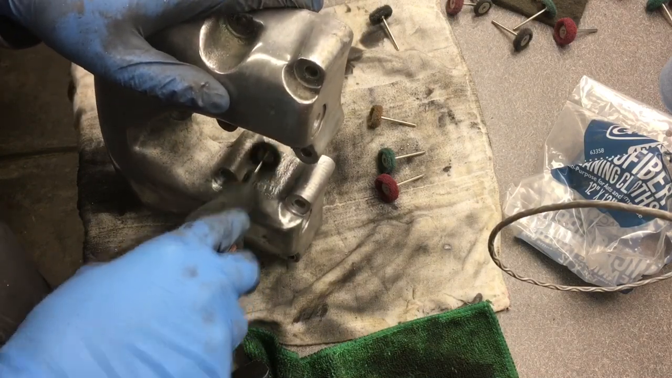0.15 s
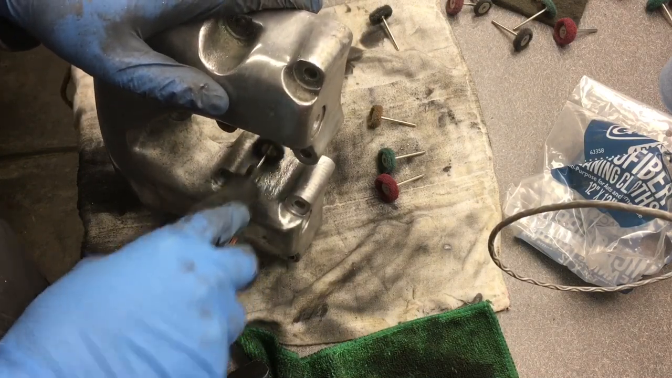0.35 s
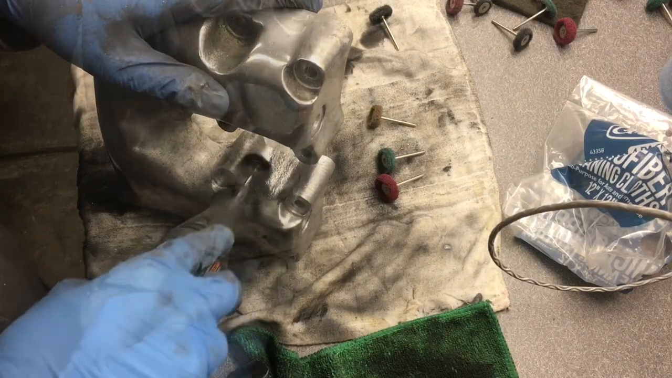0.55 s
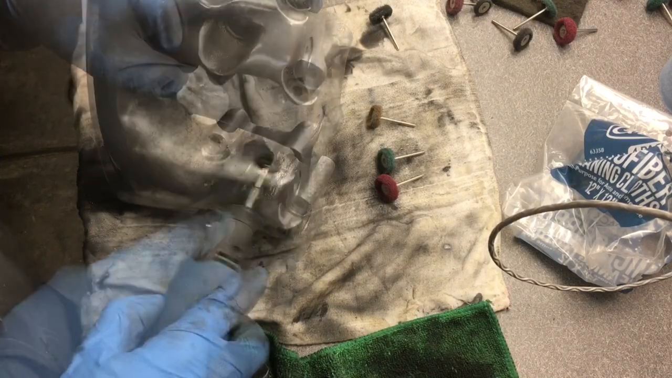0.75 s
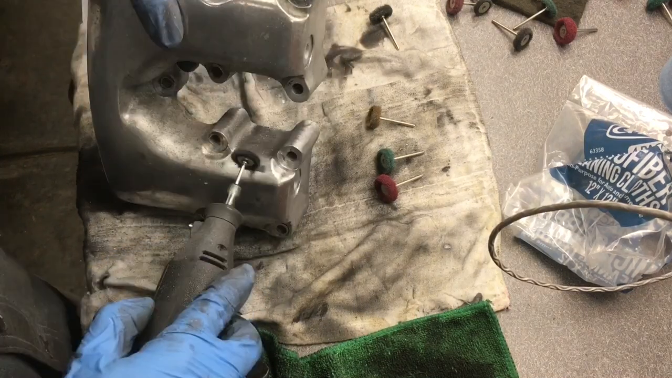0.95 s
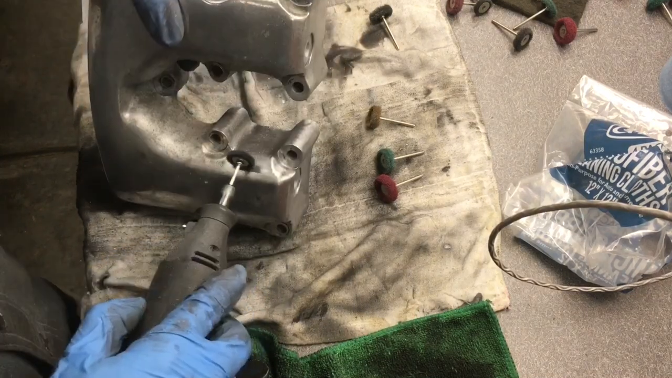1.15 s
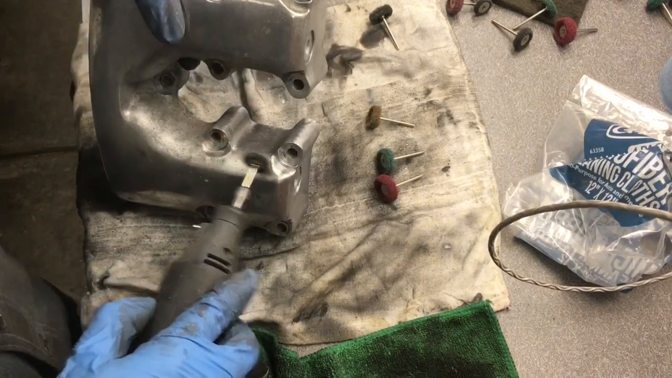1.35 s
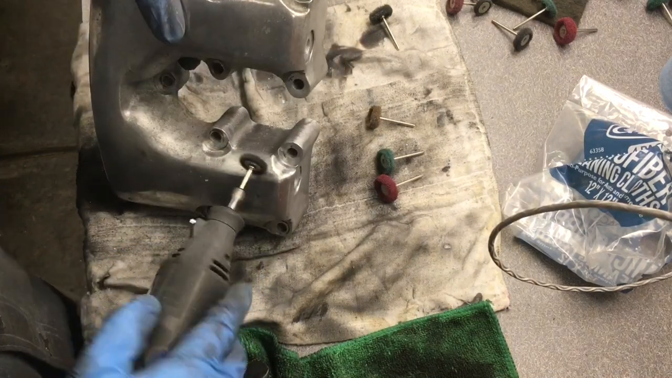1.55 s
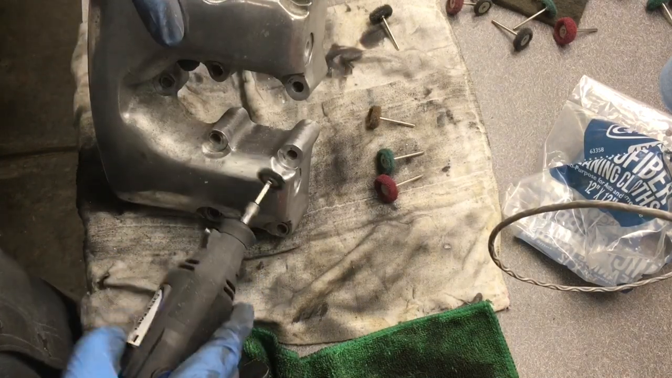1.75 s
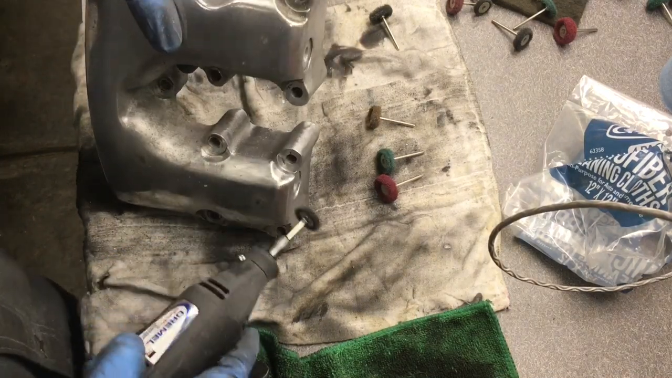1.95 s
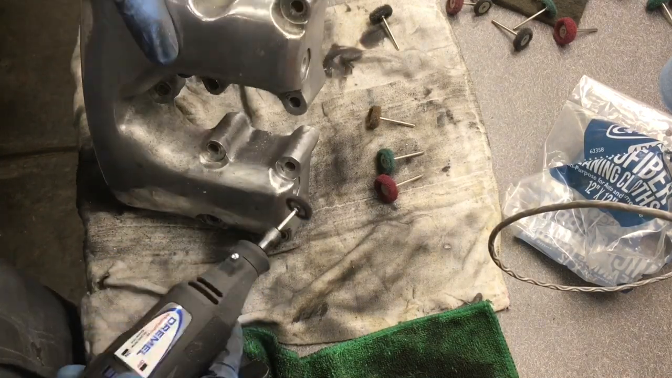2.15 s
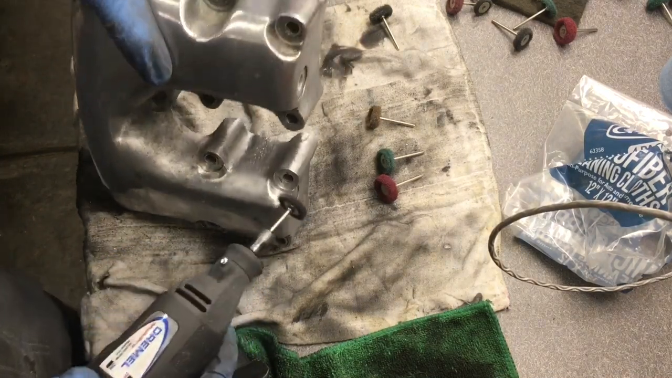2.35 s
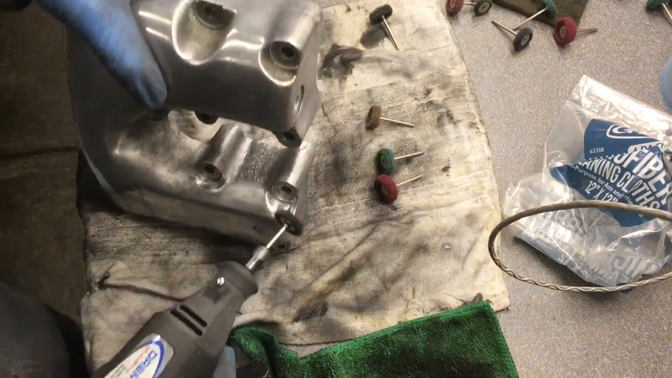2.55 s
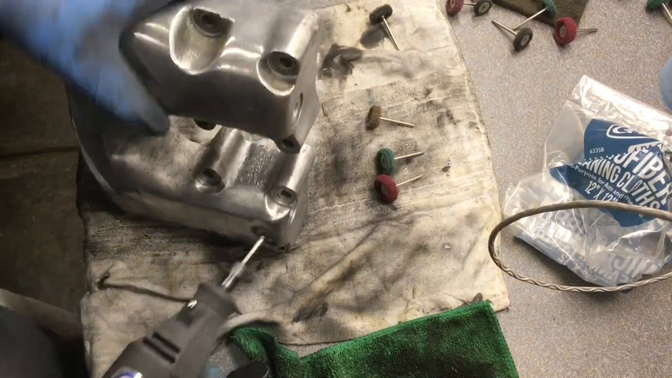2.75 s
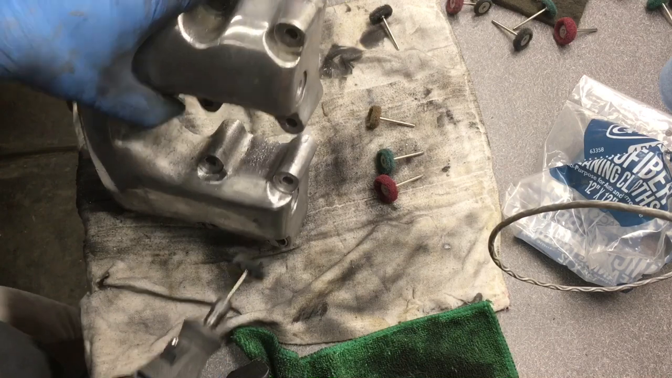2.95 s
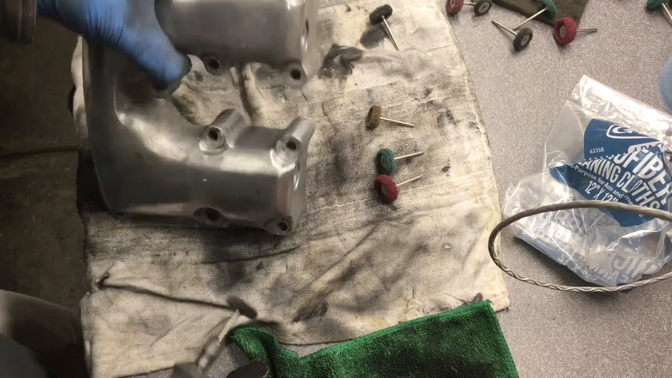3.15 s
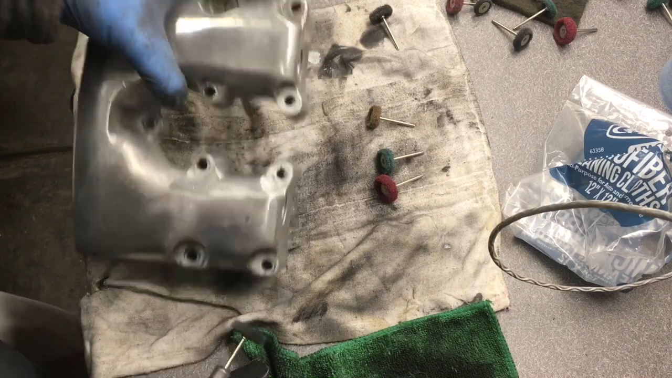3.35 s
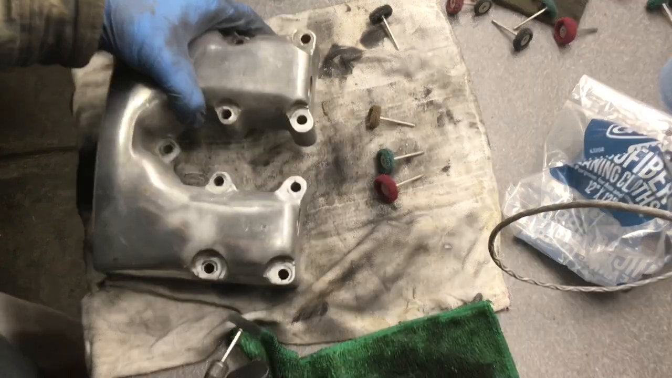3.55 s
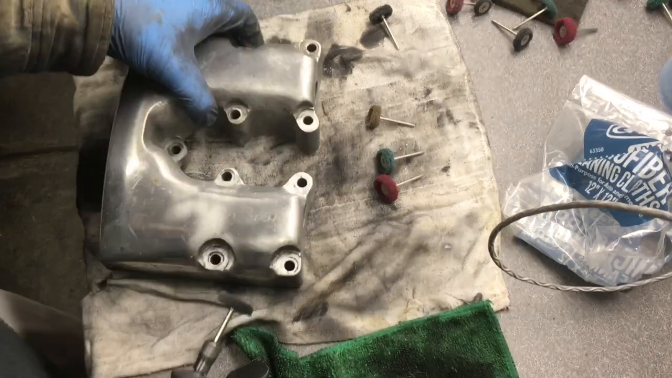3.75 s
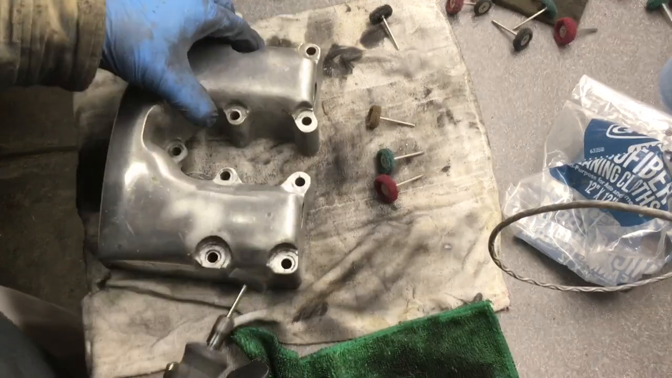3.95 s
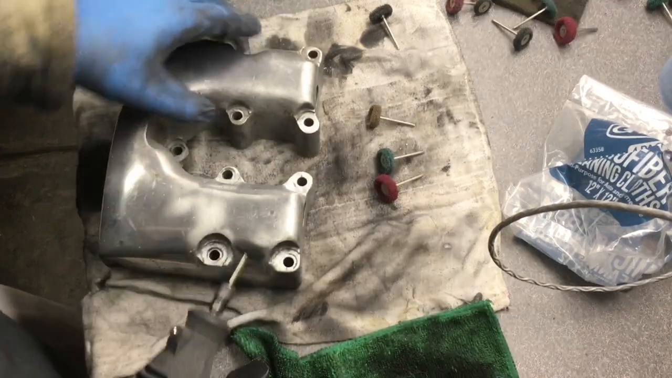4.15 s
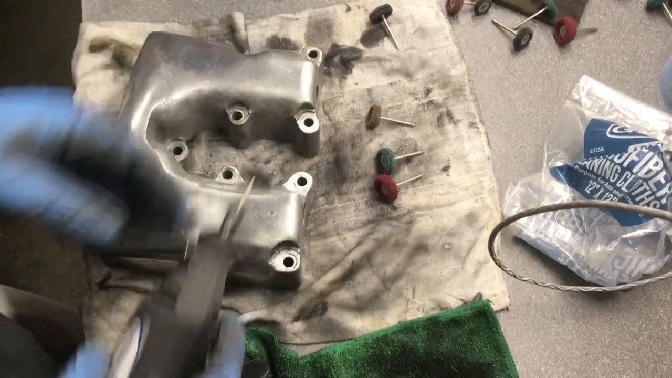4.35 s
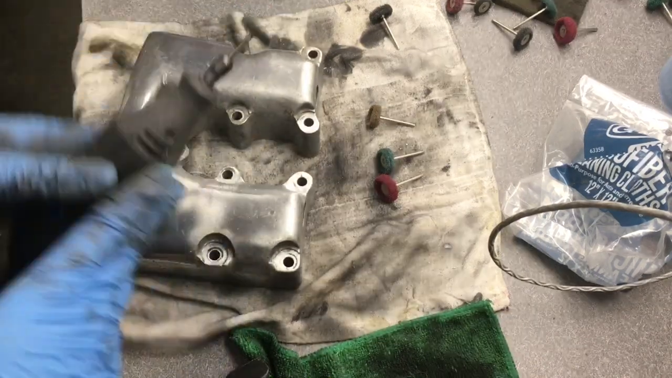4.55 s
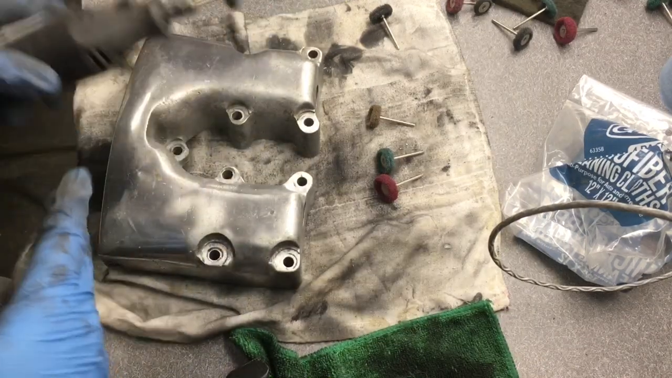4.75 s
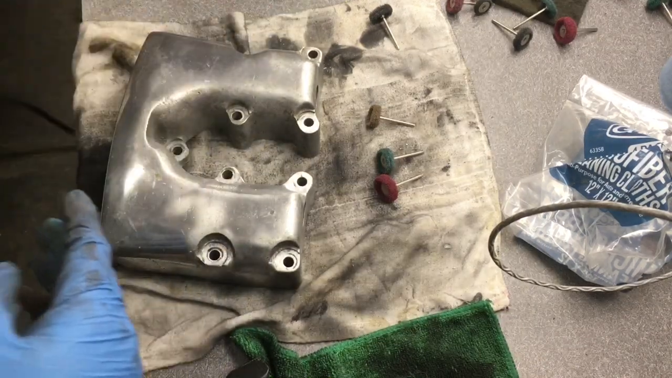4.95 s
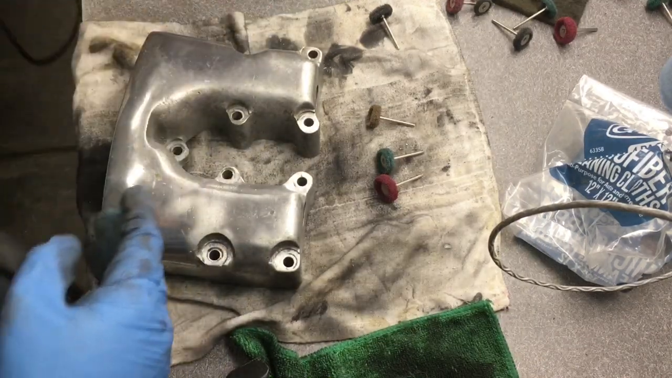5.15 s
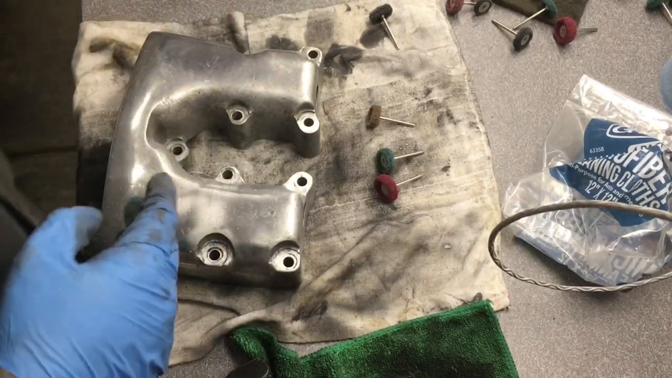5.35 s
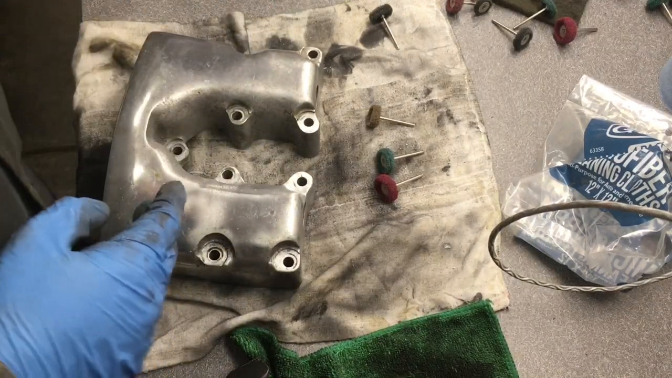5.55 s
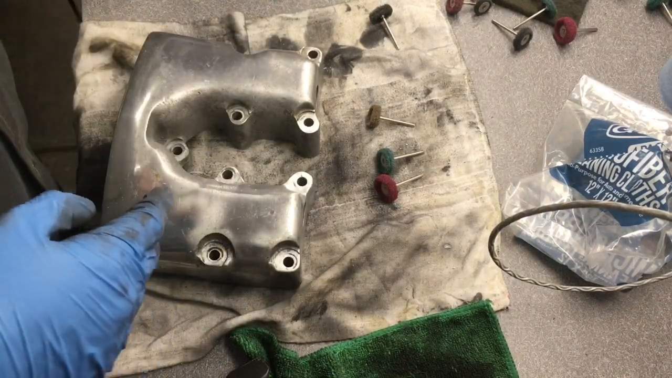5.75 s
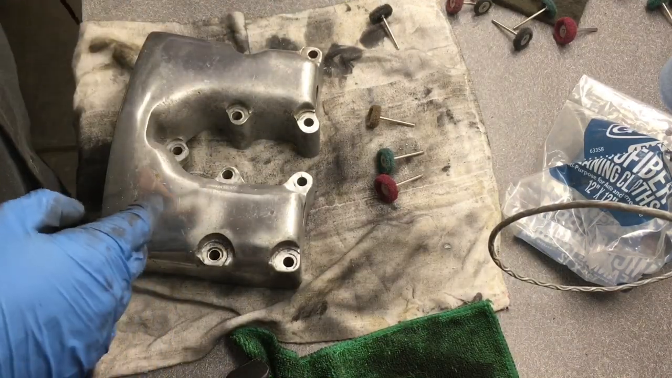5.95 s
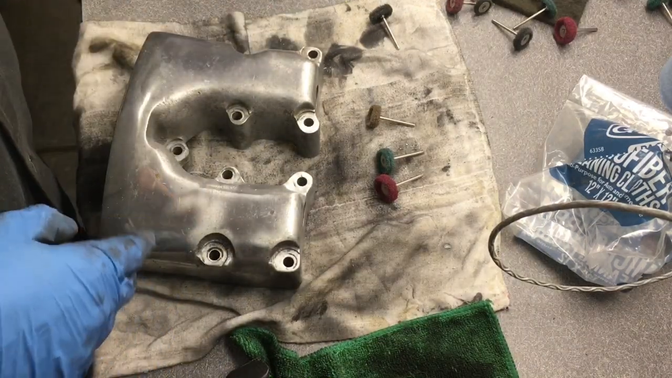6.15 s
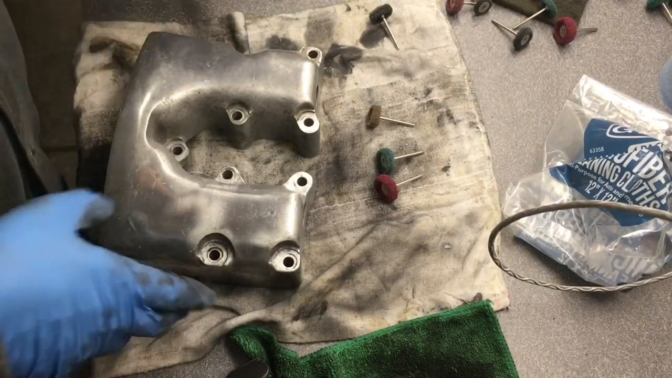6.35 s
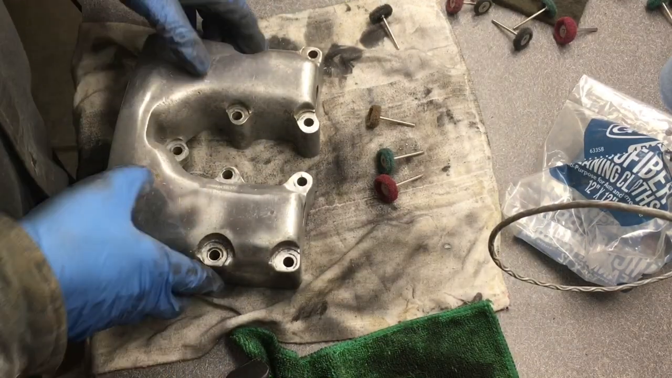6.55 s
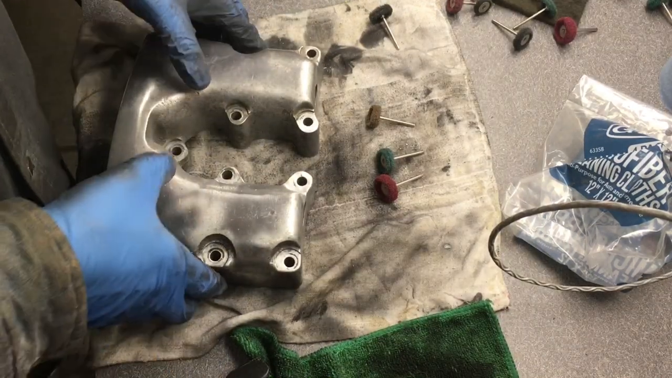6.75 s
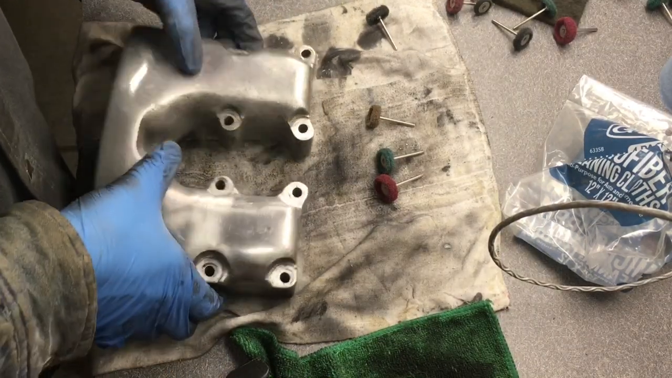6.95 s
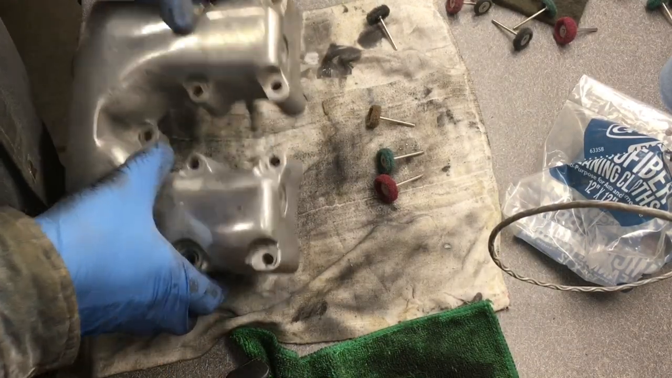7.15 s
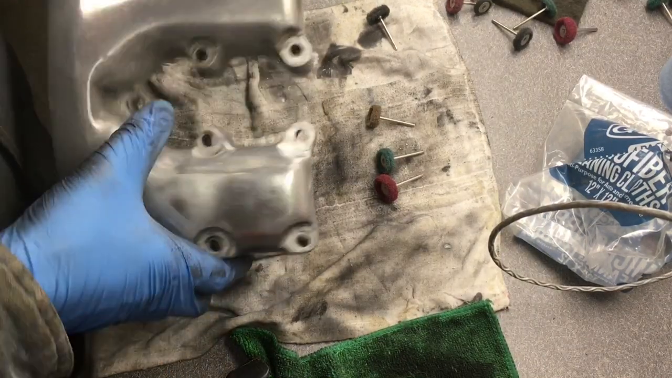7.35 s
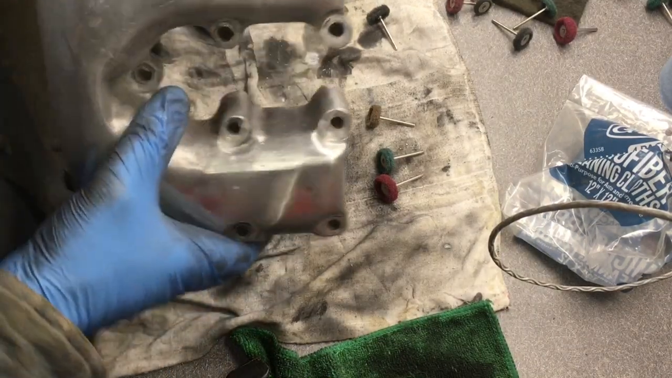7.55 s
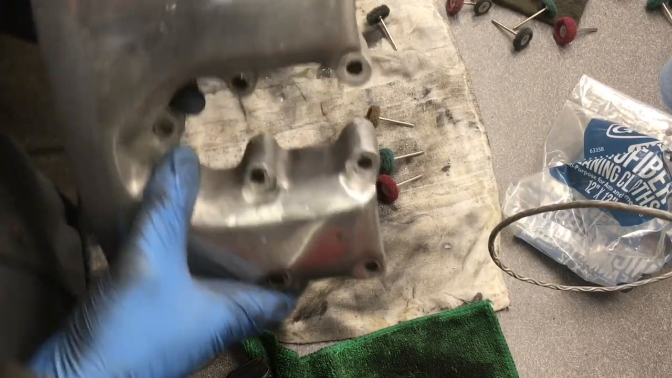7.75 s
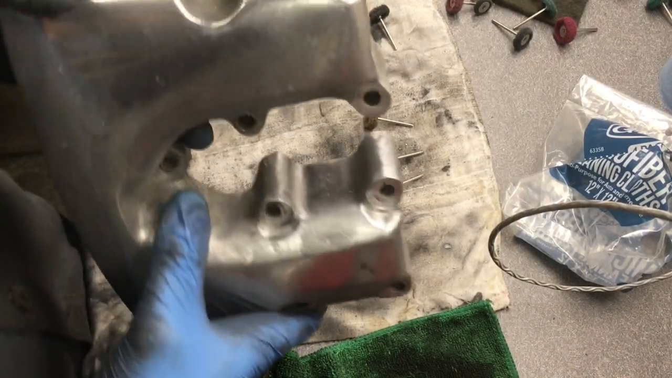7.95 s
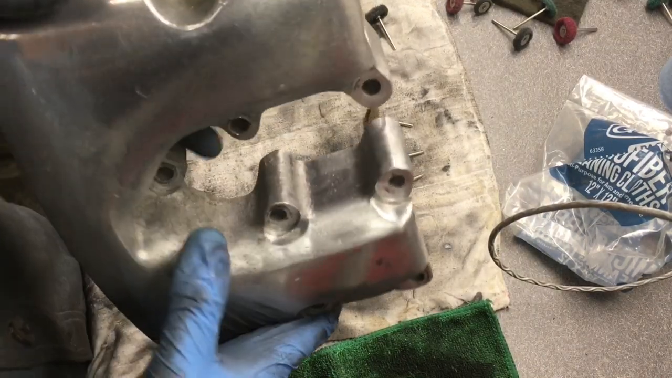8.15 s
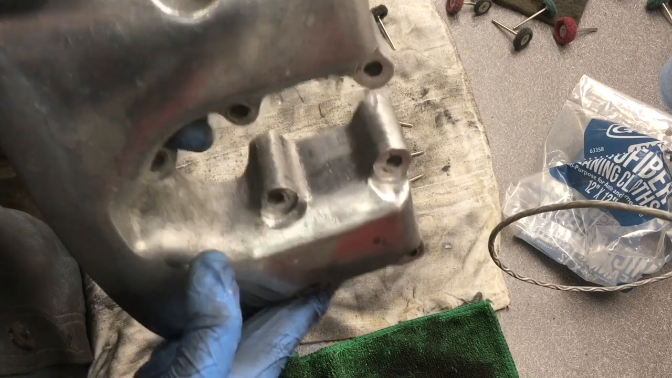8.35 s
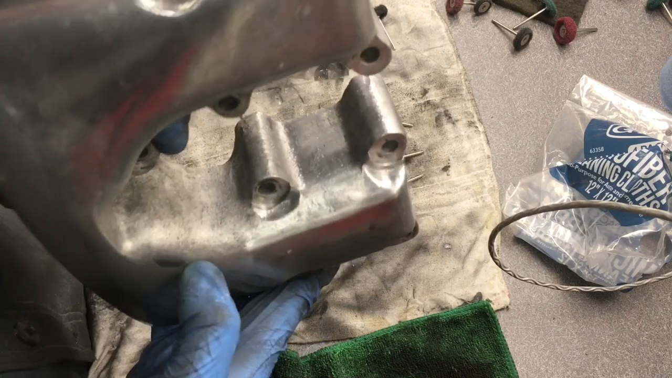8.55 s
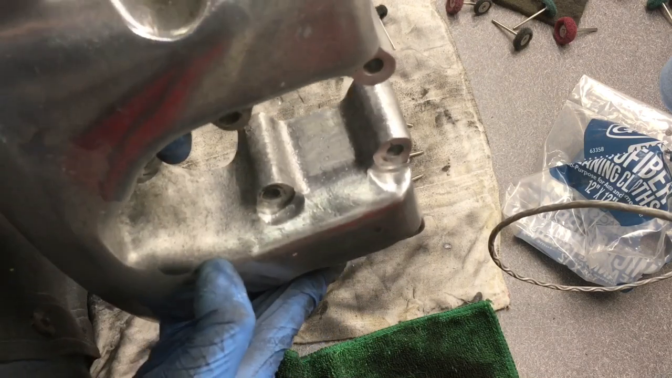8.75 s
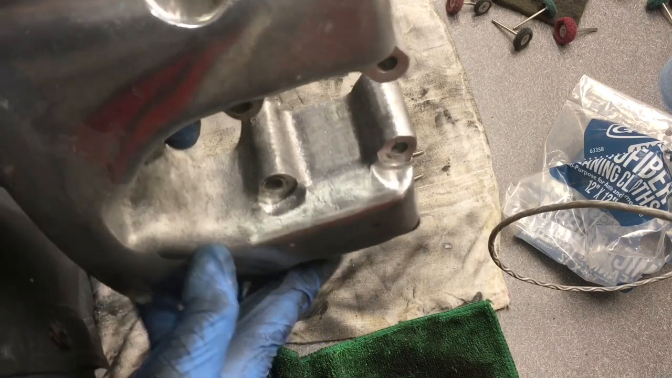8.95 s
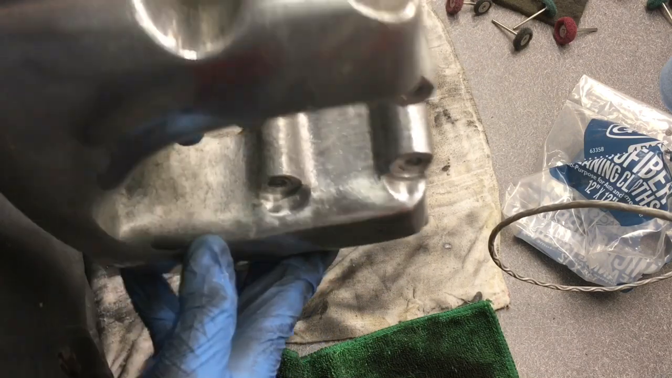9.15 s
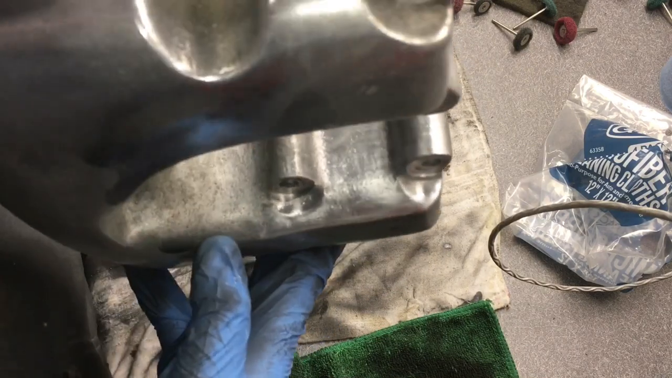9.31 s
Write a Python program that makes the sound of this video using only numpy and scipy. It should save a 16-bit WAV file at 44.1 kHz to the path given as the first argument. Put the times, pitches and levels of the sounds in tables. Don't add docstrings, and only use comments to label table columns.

```python
import sys
import numpy as np
from scipy import signal
from scipy.fft import rfft, irfft, next_fast_len
from scipy.io import wavfile
from scipy.ndimage import uniform_filter1d

SR = 44100
rng = np.random.default_rng(int(sys.argv[2]) if len(sys.argv) > 2 else 0)


def pcm_store(signal):
    levels = np.round(np.clip(np.atleast_2d(signal), -1, 1) * 32767)
    wavfile.write(sys.argv[1], SR, levels.astype(np.int16).T)


def makeup_ratio(level_db):
    decades = np.asarray(level_db, float) / 20
    return 10 ** decades


N = 413658
TIME = np.arange(N) / SR

# (frequency [Hz], level [dB per Hz])
ROOM_TONE = [(18, -40), (30, -11), (59, 13.5), (100, -22), (114, -31.5), (231, -22.5), (263, -40),
             (333, -23), (444, -53.5), (750, -32), (924, -63), (1050, -58.5), (15600, -68.5)]
ROOM_DB = -53.5
# (frequency [Hz], width [Hz], level [dB])
HUM = [(51.2, 9.2, -47), (70.2, 18, -55), (84.6, 21, -70), (320.5, 33, -62), (222, 21, -66.5)]
# (frequency [Hz], level [dB per Hz])
HISS = [(500, -12), (1000, 0), (4000, -5), (15800, -6)]
HISS_DB = -71
# (frequency [Hz], width [Hz], depth [0-1])
MOUNT_DIPS = [(4860, 490, 0.43), (10390, 190, 0.6)]
CUTOFF_HZ = 15770

# (frequency [Hz], level [dB per Hz])
HANDLING_COLOUR = [(240, -36), (400, 9), (511, 3), (957, 2.5), (1100, 0), (1470, -2.5), (1850, -6.5),
                   (2060, -8.5), (4920, -10.5), (6090, -10), (15500, -13)]
# (start [s], length [s], level [dB], brightness [dB])
RUSTLES = [(4.442, 0.085, -53, 4), (4.605, 0.046, -52.5, 3.5), (4.752, 0.067, -59, -3),
           (4.89, 0.037, -64.5, 3), (5.032, 0.018, -63.5, 2), (5.025, 0.21, -66.5, -12),
           (5.27, 0.33, -67, 1), (5.532, 0.21, -68.5, 2), (5.76, 0.2, -69.5, 1), (6.329, 0.28, -71, 5.5),
           (6.59, 0.24, -66.5, 5.5), (6.865, 0.39, -62.5, 6.5), (7.31, 0.29, -65, 7.5),
           (7.57, 0.087, -59.5, 7.5), (7.704, 0.065, -63, 7), (7.8, 0.29, -69, 7),
           (7.961, 0.046, -65.5, 2.5), (8.156, 0.017, -54.5, 8.5), (8.212, 0.019, -76, 23.5),
           (8.274, 0.023, -61.5, 7), (8.37, 0.16, -61, 6.5), (8.617, 0.16, -69, 4.5),
           (8.778, 0.067, -71, 8), (8.902, 0.19, -63, 7), (9.135, 0.14, -67.5, 3.5)]
RUSTLE_ATTACK_S, RUSTLE_RELEASE_S, RUB_DB, REST_DB = 0.029, 0.047, -7, -83
RUSTLE_SWELL_SHARE = 0.41
# (frequency [Hz], width [Hz])
SHELL = [(6200, 120), (8700, 39), (9400, 67), (12200, 87), (13100, 90), (15400, 110)]

# (time [s], frequency [Hz], level [dB])
SLIDE = [
    (7.0, 955, -84),
    (7.1, 955, -78),
    (7.2, 955, -73),
    (7.29, 955, -69),
    (7.42, 955, -75),
    (7.55, 955, -82),
]
# (time [s], frequency [Hz], level [dB])
WHISTLE = [
    (7.1, 6000, -84),
    (7.19, 6000, -70),
    (7.23, 6400, -73),
    (7.3, 6650, -80),
]
# (frequency [Hz], level [dB], t60 [s])
CASTING = [(970, -17, 0.28), (1300, -8, 0.044), (1466, 2, 0.033), (1580, -4, 0.037), (2050, 1, 0.018),
           (2500, -20, .03), (2860, -13, .04)]
# (time [s], level [dB])
LIFT = [
    (6.875, -93),
    (6.885, -59),
    (7.0, -65),
    (7.12, -67.5),
    (7.3, -75),
    (7.5, -78),
    (7.6, -99),
]
# (frequency [Hz], level [dB], t60 [s])
GLOVE = [(8850, -4, .03), (9500, 4, 0.033), (10000, -19, .03), (13000, -2.5, .03)]
# (time [s], level [dB])
SQUEAK = [
    (5.16, -91),
    (5.18, -63),
    (5.21, -65),
    (5.25, -80),
    (5.27, -92),
]

# (time [s], peak level [dB], centre [Hz], width [Hz], t60 [s])
TICKS = [(3.635, -27, 510, 494, 0.36), (5.08, -50, 1500, 1500, 0.17), (5.105, -48, 1100, 900, .15),
         (5.19, -49, 1000, 900, .15), (4.79, -50, 1500, 1500, 0.12), (5.13, -55, 1700, 1300, 0.18),
         (5.165, -58, 1400, 1200, .2), (3.626, -30, 880, 694, 0.15), (3.631, -35, 1494, 900, .08),
         (6.932, -54, 5200, 2000, .05), (7.083, -47, 6000, 2500, .06), (7.622, -48, 3600, 700, .09),
         (4.463, -39, 1480, 1500, 0.063), (4.626, -34, 9000, 9000, 0.1), (5.036, -46, 4070, 6000, 0.21),
         (5.501, -46, 4080, 1500, 0.048), (5.547, -35.5, 1610, 1820, 0.079), (5.584, -37, 780, 820, 0.34),
         (5.628, -41, 1300, 1480, 0.077), (5.586, -44.5, 9000, 9000, 0.47), (5.781, -50, 2000, 2980, 0.13),
         (5.806, -38.5, 3480, 3500, 0.024), (6.233, -54.5, 740, 398, 0.096),
         (6.882, -47, 1700, 1490, 0.076), (6.935, -43, 11000, 6000, .03), (7.487, -42, 10000, 8000, .04),
         (7.724, -46, 7340, 2000, .06), (8.574, -48, 8800, 1500, 0.056), (8.755, -26.5, 3710, 500, 0.043),
         (8.756, -38, 1500, 600, 0.035), (8.758, -28, 2200, 1400, 0.018),
         (8.755, -26.5, 11010, 9000, 0.045), (8.847, -52, 3550, 500, 0.031), (9.343, -27, 1600, 500, 0.018),
         (9.344, -35, 945, 400, 0.036), (9.344, -41, 2440, 500, 0.1), (9.344, -38, 3900, 600, 0.069),
         (9.345, -46, 7460, 1200, .1), (9.344, -36, 13500, 4000, 0.091), (9.356, -43, 9500, 1200, 0.052)]
# (time [s], peak level [dB], contact [Hz], long-ring share [dB])
THUDS = [(3.615, -30, 140, -3), (3.623, -2.5, 666, -12), (3.627, -7, 170, -12), (3.628, -3, 534, 3),
         (3.631, -5, 500, -6), (3.987, -11, 150, 27), (4.031, -20, 150, 8), (4.062, -21, 250, 12),
         (4.097, -23.5, 150, 8), (4.147, -26, 150, 14), (5.059, -39, 300, -10), (5.217, -32.5, 507, -20),
         (5.584, -26, 300, -10), (5.589, -39, 300, 0), (5.6, -35, 300, 5), (5.608, -37, 350, 0),
         (5.629, -27, 300, -3), (5.64, -31.5, 300, -2), (5.81, -16, 105, 10.5), (6.54, -33.5, 148.5, 9),
         (6.877, -38, 298, -9), (9.36, -28, 252, -14)]
# (frequency [Hz], level [dB], t60 [s])
BENCH = [(64.7, -24.5, 1), (96.7, -8.5, 0.18), (123.5, -1.5, 0.26), (179, -7, 0.14), (273, -5.5, 0.097),
         (393, -7, 0.091), (465, 2, 0.049), (552, -6, 0.11), (650, 4.5, 0.044), (893, -4, 0.087),
         (1200, -5, 0.09)]

# (angle [turns], strength [dB])
BARS = [(0, 0), (.128, -1), (.268, -7), (.381, -9), (.494, -3), (.632, 1), (.757, -5), (.886, -8)]
BOUNCE_S, BOUNCE_DB, BAR_WANDER_DB = .00062, -8, 3.0
# (frequency [Hz], width [Hz], level [dB])
HOUSING = [(1200, 300, -18), (2350, 400, -8), (3600, 800, -4), (4500, 400, -5), (5800, 900, -3),
           (7300, 900, -3), (8800, 900, -3), (9800, 700, -3), (11400, 1200, -4), (12600, 1200, -3),
           (14200, 2000, -3)]
BRUSH_DB, BRUSH_RISE_DB_PER_TURN_PER_S, BRUSH_TOP_DB = -21, .095, 3.5
DRAG_SHARE = 0.52

# (time [s], speed [turns/s])
FIRST_SPEED = [
    (0.0, 438.7),
    (0.13, 436.2),
    (0.26, 435.0),
    (0.38, 432.1),
    (0.56, 440.6),
    (0.65, 450.3),
    (0.74, 457.8),
    (0.95, 465.0),
]
# (time [s], speed [turns/s])
SECOND_SPEED = [
    (0.6, 480.0),
    (0.82, 479.4),
    (0.95, 475.0),
    (1.12, 479.9),
    (1.5, 486.0),
    (1.62, 492.0),
    (1.8, 510.5),
    (2.16, 530.0),
    (2.555, 538.6),
]
SWITCH_OFF_S, REFERENCE_TURNS_PER_S = 2.555, 500
BEARING_LOSS, BEARING_POWER, WINDAGE_LOSS, WINDAGE_POWER = 288.0, .1398, 45.1, 9.11
LIFT_OFF_S, LIFT_OFF_TAKES_S = 2.575, 0.015
FADE_OUT_S, FADE_IN_S = (0.63, 1), (0.55, 0.98)

# (time [s], wheel contact [dB], uneven bite [dB], vents facing the microphone [dB])
FIRST_HAND = [
    (0.0, -6, -49, 4.5),
    (0.26, -7, -48, 6),
    (0.38, -8.5, -35.5, -5.5),
    (0.47, -6, -53, 12),
    (0.56, -7.5, -63, -1),
    (0.95, -28, -57, -2),
]
# (time [s], wheel contact [dB], uneven bite [dB], vents facing the microphone [dB])
SECOND_HAND = [
    (0.6, -11, -34, -7),
    (0.95, -8, -33.5, 2),
    (1.2, -8, -32, 4.5),
    (1.44, -8, -49.5, 1.5),
    (1.76, 1, -38.5, -1.5),
    (2.04, 1.5, -32.5, -7.5),
    (2.16, 1.5, -22, -7),
    (2.5, 1.5, -21.5, -6.5),
    (2.7, 2.5, -20.5, 5),
    (2.9, -3, -22.5, -1.5),
]

# (frequency [Hz], level [dB])
UNBALANCE = [(40, -95), (160, -61), (240, -58), (300, -50.5), (364, -39.5), (400, -29), (426, -27),
             (540, -29)]
# (frequency [Hz], level [dB])
THIRD = [(130, -109), (720, -59), (995, -45), (1190, -36.5), (1400, -36.5), (1530, -30.5), (1615, -41.5)]
# (frequency [Hz], level [dB])
BLADE = [(750, -75), (1300, -58), (1900, -64), (2500, -55), (2950, -61), (3500, -51), (4600, -43.5),
         (5200, -32), (6400, -32.5), (7000, -31.5), (7600, -34.5), (8300, -25.5), (8750, -28.5),
         (9300, -25)]
# (frequency [Hz], level [dB])
BLADE_TWICE = [(1500, -90), (5000, -70), (9000, -61), (11500, -66), (14000, -40), (15200, -35),
               (15700, -42.5)]
CONTACT_SHARE, BITE_SHARE, THIRD_DRIVEN_DB, SECOND_FREE_DB = 0.59, 0.041, 3.5, -36.5
# (order, level [dB], wheel contact share, uneven bite share)
DRIVEN = [(4, -1, 0.7, 0.52), (5, -4.5, 0.96, 0.36), (6, 0.5, 0.75, 0.57), (7, -5.5, 0.71, 0.12),
          (8, -6, 0.57, 0.61), (9, -5.5, 0.93, .6), (10, -10, 0.93, 0.75), (11, -10.5, 1, 0.046),
          (12, -16, .3, 0), (13, -13.5, 0.54, 0.064), (14, -15, 0.43, 0.21), (15, -19.5, .3, 0),
          (16, -16, .4, 0.11), (17, -12.5, .4, 0.12), (19, -18.5, .1, 0), (23, -11, 0.33, 0.11),
          (24, -19.5, .3, 0), (25, -14.5, .2, 0.0063)]
CHATTER_DB = -33
# (middle [s], length [s], order, level [dB])
FIRST_CATCHES = [(0.36, 0.26, 8, -42.5), (0.33, 0.15, 7, -48), (.27, 0.31, 6, -51.5),
                 (0.26, 0.14, 9, -44.5), (0.22, .2, 16, -44), (0.54, 0.15, 16, -39), (.25, .25, 17, -50),
                 (0.17, 0.13, 19, -55), (0.83, .12, 19, -37.5), (0.77, .12, 19, -29), (.1, 0.28, 15, -44.5),
                 (.36, 0.092, 15, -49), (0.88, 0.35, 5, -44), (0.93, 0.098, 14, -40.5)]
# (middle [s], length [s], order, level [dB])
SECOND_CATCHES = [(1.03, 0.086, 14, -33.5), (1.294, 0.16, 13, -38), (1.1, .6, 19, -37),
                  (1.54, .12, 19, -35), (1.4, 0.29, 5, -40.5), (2, .25, 5, -31), (1.74, 0.18, 5, -43.5),
                  (1.517, 0.19, 4, -38), (1.8, 0.17, 6, -42.5), (1.15, 0.66, 9, -47.5), (1.3, 0.5, 7, -51),
                  (2.1, 0.38, 16, -38), (3.7, 0.49, 17, -38.5), (4.2, 0.22, 17, -29.5),
                  (1.5, 0.15, 23, -33), (1.2, .3, 16, -57.5), (1.5, 0.23, 8, -38.5), (2.3, 0.6, 8, -39.5),
                  (2.2, 0.11, 4, -37.5)]
# (middle [s], length [s], order, level [dB])
FLARES = [(2.708, 0.061, 8.0, -49), (2.735, 0.21, 7.0, -39.5), (2.756, 0.17, 10.0, -46),
          (2.781, 0.1, 6.0, -49), (2.816, 0.084, 8.0, -45.0), (2.818, 0.13, 5.0, -35.5),
          (3, 0.11, 8.0, -60), (3.025, 0.103, 9.0, -37.5), (3.072, 0.16, 5.0, -43),
          (3.155, 0.091, 9.0, -45), (3.164, 0.069, 10.0, -50), (3.188, 0.067, 28.0, -38.5),
          (3.202, 0.077, 23.0, -43.0), (3.208, 0.118, 25.0, -45.0), (3.222, 0.157, 11.0, -48),
          (3.255, 0.133, 19.0, -53), (3.266, 0.1, 10.0, -43), (3.405, 0.084, 13.0, -58),
          (3.471, 0.085, 14.0, -50), (3.473, 0.16, 21.0, -53), (3.492, 0.074, 23.0, -51),
          (3.541, 0.14, 15.0, -54), (3.572, 0.17, 24.0, -58), (3.575, 0.14, 8.0, -49),
          (3.588, 0.11, 16.0, -41.0), (3.591, 0.13, 25.0, -58), (3.677, 0.213, 33.0, -63),
          (3.699, 0.274, 20.0, -66), (3.714, 0.17, 17.0, -57), (3.727, 0.1, 15.0, -69),
          (3.73, 0.059, 16.0, -50.5), (3.752, 0.205, 31.0, -64), (3.781, 0.069, 24.0, -54),
          (3.842, 0.063, 26.0, -56), (3.842, 0.165, 19.0, -69), (3.858, 0.284, 21.0, -71),
          (3.878, 0.091, 15.0, -51), (3.909, 0.13, 22.0, -64), (3.93, 0.12, 24.0, -47.5),
          (3.932, 0.27, 25.0, -60), (3.937, 0.15, 23.0, -65), (4.001, 0.272, 30.0, -68),
          (4.015, 0.261, 16.0, -62), (4.038, 0.13, 28.0, -64), (4.043, 0.174, 29.0, -62),
          (4.089, 0.181, 32.0, -60), (4.101, 0.13, 31.0, -66), (4.104, 0.11, 22.0, -71),
          (4.104, 0.069, 23.0, -59), (4.1, 0.22, 33.0, -60)]
FLARE_SKIRT, FLARE_SKIRT_DB = 2.3, -10

# (frequency [Hz], level [dB per Hz])
AIR_COLOUR = [(88, -52), (150, -36.5), (201, -24), (428, -6), (656, -7), (966, 0.5), (1290, 6), (1420, -2),
              (2410, -3), (2810, -7), (3480, -5.5), (4840, -9.5), (5440, -8.5), (7710, -2), (15500, 0.5)]
# (level at reference speed [dB], power of speed, contact share, vent facing share)
AIR_PARTS = [
    (-34, 1.58, 0.025, 0.091),
    (-34.5, 1.35, 0.27, .02),
    (-25, 1.63, 0.039, .05),
]
AIR_WORK_DB = 0.5


def rms_one(x):
    return x / np.sqrt(np.mean(x ** 2) + 1e-20)


def ramp(start_s, end_s):
    return np.clip((TIME - start_s) / (end_s - start_s), 0, 1)


def at_hz(points, hz):
    point_hz, point_db = np.transpose(points)
    return np.interp(np.log(hz), np.log(point_hz), point_db)


def in_time(rows, fade_s=0.026):
    s, *columns = np.transpose(rows)
    since_start = TIME - s[0] + (s[0] < .01)
    until_end = s[-1] - TIME + (s[-1] > 9.3)
    gate = np.clip(np.minimum(since_start, until_end) / fade_s, 0, 1)
    return [np.interp(TIME, s, c) for c in columns], gate


def drift(rate_hz):
    r = np.exp(-80 * np.pi * rate_hz / SR)
    white = rng.standard_normal(N // 40 + 2002)
    slow = signal.lfilter([1], [1, -2 * r, r * r], white)[2000:]
    return np.interp(np.arange(N) / 40, np.arange(len(slow)), rms_one(slow))


def resonance(x, hz, width_hz):
    r = np.exp(-np.pi * width_hz / SR)
    poles = [1, -2 * r * np.cos(2 * np.pi * hz / SR), r * r]
    return signal.lfilter([(1 - r * r) / 2, 0, (r * r - 1) / 2], poles, x + 1e-18)


def ring(x, hz, t60_s):
    r, w = makeup_ratio(-60 / (t60_s * SR)), 2 * np.pi * hz / SR
    return signal.lfilter([0, np.sin(w)], [1, -2 * r * np.cos(w), r * r], x + 1e-18)


def noise_parts(spectrum, splits_hz):
    size = next_fast_len(N)
    hz = np.fft.rfftfreq(size, 1 / SR) + 1
    white = rfft(rng.standard_normal(size)) * makeup_ratio(at_hz(spectrum, hz))
    above = [np.ones_like(hz)] + [1 / (1 + (s / hz) ** 10) for s in splits_hz] + [0 * hz]
    return [rms_one(irfft(white * np.sqrt(np.abs(a - b)), size)[:N]) for a, b in zip(above, above[1:])]


def workshop():
    white = rng.standard_normal(N + SR)
    hum = np.zeros(N)
    for hz, width_hz, db in HUM:
        narrow = resonance(resonance(white, hz, width_hz), hz, 3 * width_hz)
        hum += makeup_ratio(db) * rms_one(narrow[SR:])
    room = makeup_ratio(ROOM_DB) * noise_parts(ROOM_TONE, [])[0]
    hiss = makeup_ratio(HISS_DB) * noise_parts(HISS, [])[0]
    return room + hum + hiss


def handling():
    t = TIME[::40]
    levels = np.full((3, len(t)), makeup_ratio(REST_DB))
    for s, length_s, db, bright_db in RUSTLES:
        attack_s = RUSTLE_ATTACK_S + RUSTLE_SWELL_SHARE * length_s
        rise = np.clip((t - s + RUSTLE_ATTACK_S) / attack_s, 0, 1)
        swell = rise * np.exp(-np.maximum(t - s - length_s, 0) / RUSTLE_RELEASE_S)
        levels = levels + swell * makeup_ratio(db + np.array([[-bright_db], [RUB_DB], [bright_db]]))
    drag_level, rub_level, bright_level = [np.interp(TIME, t, level) for level in levels]

    def patchy(part):
        return makeup_ratio(2.2 * drift(12)) * part

    drag, rub, *rustle = noise_parts(HANDLING_COLOUR, [2332, 6000, 9000, 12400])
    bright = sum(makeup_ratio(db) * patchy(part) for db, part in zip((-17.5, -14.0, -3.0), rustle))
    shell = sum(makeup_ratio(4 * drift(3)) * resonance(bright, hz, width_hz) for hz, width_hz in SHELL)
    lifted = np.interp(TIME, [6.9, 7.1, 7.8, 8.4], [.2, 1.2, 1.2, .3])
    grain = makeup_ratio(1.6 * drift(40))
    return grain * (drag_level * patchy(drag) + rub_level * patchy(rub) + bright_level * (bright + lifted * shell))


def sung(rows, waver):
    (hz, db), gate = in_time(rows)
    cycles = np.cumsum(hz * (1 + waver * drift(30))) / SR
    return gate * np.sqrt(2) * makeup_ratio(db + 1.5 * drift(15)) * np.sin(2 * np.pi * cycles)


def rubbed(modes, drive):
    (level_db,), gate = in_time(drive, fade_s=.005)
    white = rng.standard_normal(N)
    return gate * makeup_ratio(level_db) * sum(makeup_ratio(db) * rms_one(ring(white, hz, t60_s)) for hz, db, t60_s in modes)


def ticks():
    out, t = np.zeros(N), np.arange(SR // 5) / SR
    for s, db, hz, width_hz, t60_s in TICKS:
        decay = makeup_ratio(-60 * t / t60_s) + 0.84 * makeup_ratio(-60 * t / 0.013)
        crack = rng.standard_normal(len(t)) * decay * np.minimum(t / .0012, 1)
        crack = resonance(resonance(crack, hz, width_hz), hz, 2 * width_hz)
        crack = signal.sosfilt(signal.butter(2, hz / 2.5, "high", fs=SR, output="sos"), crack)
        at = round(s * SR)
        out[at:at + len(t)] += (makeup_ratio(db) * crack / np.abs(crack).max())[:N - at]
    return out


def thuds():
    out, t = np.zeros(N), np.arange(SR // 2) / SR
    for s, db, contact_hz, long_db in THUDS:
        push = t ** 2 * np.exp(-3 * np.pi * contact_hz * t)
        push /= push.sum()
        hit = np.zeros(len(t))
        for hz, mode_db, t60_s in BENCH:
            strength_db = mode_db + 1.4 * rng.standard_normal() + long_db * (hz < 110)
            hit += makeup_ratio(strength_db) * ring(push, hz, t60_s)
        at = round(s * SR)
        out[at:at + len(t)] += (makeup_ratio(db) * hit / np.abs(hit).max())[:N - at]
    return signal.sosfilt(signal.butter(2, 55, "high", fs=SR, output="sos"), out)


def brush(turns, gate, uneven_db):
    live = np.flatnonzero(gate > 0)
    clicks, step = np.zeros(live[-1] + 1), np.gradient(turns)
    for angle, db in BARS:
        near = ((turns[live] - angle + .5) % 1 - .5) / step[live]
        close = np.abs(near) < 16
        at, near = live[close], near[close]
        chance = rng.standard_normal((2, int(turns[-1]) + 2))
        wander = rms_one(uniform_filter1d(chance[1], size=24))
        each_turn = makeup_ratio(db + uneven_db * chance[0] + BAR_WANDER_DB * wander)
        strength = each_turn[np.round(turns[at] - angle).astype(int)]
        click = np.sinc(.75 * near) * np.exp(-(near / 6) ** 2)
        clicks[at] += strength * click / np.sqrt(step[at])
    clicks = clicks + makeup_ratio(BOUNCE_DB) * np.roll(clicks, round(BOUNCE_S * SR))
    rung = np.zeros(len(clicks))
    for k, (hz, width_hz, db) in enumerate(HOUSING):
        rung += (-1) ** k * makeup_ratio(db) * resonance(clicks, hz, width_hz)
    return gate * np.pad(rung, (0, N - len(rung))) / rung[live].std()


def coasting(speed):
    slowing = [speed[round(SWITCH_OFF_S * SR)]]
    while slowing[-1] > 1:
        share = slowing[-1] / REFERENCE_TURNS_PER_S
        loss = BEARING_LOSS * share ** BEARING_POWER + WINDAGE_LOSS * share ** WINDAGE_POWER
        slowing.append(max(slowing[-1] - loss / 1000, 1))
    off_ms = (TIME - SWITCH_OFF_S) * 1000
    return np.where(off_ms < 0, speed, np.interp(off_ms, np.arange(len(slowing)), slowing))


def catching(catches, k):
    out = np.zeros(N)
    for s, length_s, multiple, db in catches:
        if round(multiple) == k:
            near = slice(max(round((s - length_s) * SR), 0), round((s + length_s) * SR))
            out[near] += makeup_ratio(db) * np.exp(-(2 * (TIME[near] - s) / length_s) ** 4)
    return out


def shaft_tones(speed, hand, catches, gate, wobble_db):
    turns, live = np.cumsum(speed * (1 + .0006 * drift(25))) / SR, gate > 0
    contact_db, bite_db, facing_db = hand

    def order(k, db, part=live):
        audible = k * speed[part] < CUTOFF_HZ + 500
        return makeup_ratio(db[part]) * np.sin(2 * np.pi * (k * turns[part] + rng.random())) * audible

    touch = 1 - ramp(LIFT_OFF_S, LIFT_OFF_S + LIFT_OFF_TAKES_S)
    settling = 1 - ramp(LIFT_OFF_S, LIFT_OFF_S + 0.16)
    work_db = CONTACT_SHARE * contact_db + BITE_SHARE * (bite_db + 32.5)
    first_db = at_hz(UNBALANCE, speed) + touch * work_db
    second_db = settling * bite_db + (1 - settling) * (first_db + SECOND_FREE_DB)
    third_db = at_hz(THIRD, 3 * speed) + THIRD_DRIVEN_DB * touch + (3 - 2 * touch) * drift(10)
    blade_db = at_hz(BLADE, 18 * speed) + facing_db + 1.5 * drift(14)
    twice_db = at_hz(BLADE_TWICE, 36 * speed) + facing_db / 2 + 1.5 * drift(9)
    out, flat_db = np.zeros(N), np.zeros(N)
    for k, db in [(1, first_db), (2, second_db), (3, third_db), (18, blade_db), (36, twice_db)]:
        out[live] += order(k, db)

    driven, free = live & (touch > 0), live & (touch < 1)
    for k, driven_db, contact, bite in DRIVEN:
        steady_db = CHATTER_DB + driven_db + contact * contact_db + bite * (bite_db + 25.5)
        steady = makeup_ratio(steady_db + wobble_db * drift(2.8))
        level = touch * (steady + catching(catches, round(k)))
        out[driven] += level[driven] * order(round(k), flat_db, driven)

    flutter_db = 2.2 * drift(18)
    skirts = [(s, FLARE_SKIRT * length_s, k, db + FLARE_SKIRT_DB) for s, length_s, k, db in FLARES]
    for k in sorted({round(row[2]) for row in FLARES}) if free.any() else []:
        flare = catching(FLARES, k) + (1 - touch) * catching(skirts, k)
        part = flare > 0
        out[part] += flare[part] * order(k, np.roll(flutter_db, 4000 * k), part)
    return np.sqrt(2) * gate * out, turns


def tool():
    early_speed, speed = in_time(FIRST_SPEED)[0][0], coasting(in_time(SECOND_SPEED)[0][0])
    early_hand, hand = in_time(FIRST_HAND)[0], in_time(SECOND_HAND)[0]
    early_gate, handover = 1 - ramp(*FADE_OUT_S), ramp(*FADE_IN_S)
    turning = np.clip(speed / 6 - 1, 0, 1)
    late_gate = handover * turning
    early, early_turns = shaft_tones(early_speed, early_hand, FIRST_CATCHES, early_gate, wobble_db=2.0)
    late, turns = shaft_tones(speed, hand, SECOND_CATCHES, late_gate, wobble_db=2.5)

    def blend(first, second):
        return (1 - handover) * first + handover * second

    speed_db = 20 * np.log10(blend(early_speed, speed) / REFERENCE_TURNS_PER_S)
    contact_db, facing_db = blend(early_hand[0], hand[0]), blend(early_hand[2], hand[2])
    low_db, middle_db, high_db = [db + power * speed_db + contact * contact_db + facing * facing_db
                                  for db, power, contact, facing in AIR_PARTS]
    middle_db = middle_db + AIR_WORK_DB * (1 - ramp(LIFT_OFF_S, LIFT_OFF_S + 0.051))
    low, middle, high = noise_parts(AIR_COLOUR, [2400, 6000])
    pulse = 1 + 0.031 * np.cos(2 * np.pi * turns)
    air = makeup_ratio(low_db) * low + pulse * (makeup_ratio(middle_db) * middle + makeup_ratio(high_db) * high)

    early_brush = early_gate * brush(early_turns, early_gate > 0, .8)
    late_brush = handover * brush(turns, late_gate > 0, .9) * makeup_ratio(1.5 * drift(6))
    slowed = (REFERENCE_TURNS_PER_S - speed) * (TIME > SWITCH_OFF_S)
    brush_db = np.clip(BRUSH_DB + BRUSH_RISE_DB_PER_TURN_PER_S * slowed, BRUSH_DB, BRUSH_TOP_DB)
    brush_db = brush_db - DRAG_SHARE * np.minimum(speed_db + 5.5, 0)
    return early + late + turning * (air + makeup_ratio(high_db + brush_db) * (early_brush + late_brush))


def scene():
    mono = workshop() + handling() + sung(SLIDE, .002) + sung(WHISTLE, .012)
    mono = mono + rubbed(CASTING, LIFT) + rubbed(GLOVE, SQUEAK) + ticks() + thuds() + tool()
    return np.array([mono, mono])


def low_pass(x):
    return signal.sosfilt(signal.butter(12, 17030, fs=SR, output="sos"), x)


def record(dry):
    mono = dry[0]
    for hz, width_hz, depth in MOUNT_DIPS:
        mono = mono - np.clip(depth, 0, 1) * resonance(mono, hz, width_hz)
    mono = .8 * np.tanh(mono / .8)
    mono = signal.sosfilt(signal.butter(4, 40, "high", fs=SR, output="sos"), mono)
    mono = signal.sosfilt(signal.ellip(12, .5, 60, CUTOFF_HZ, fs=SR, output="sos"), mono)
    return low_pass(np.array([mono, mono]))


dry = scene()
out = record(dry)
pcm_store(out)
```